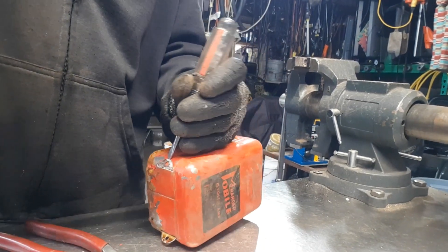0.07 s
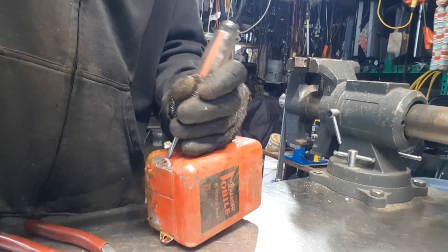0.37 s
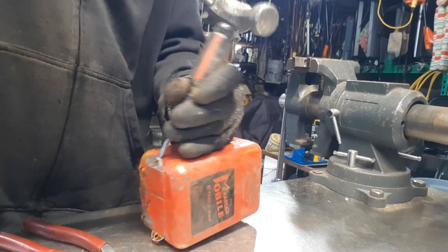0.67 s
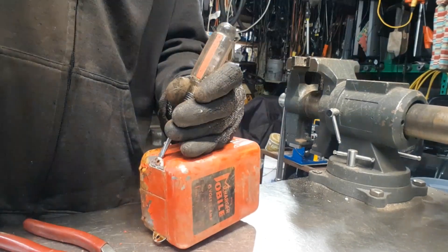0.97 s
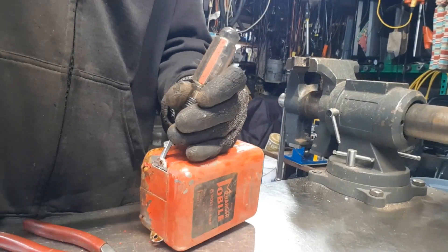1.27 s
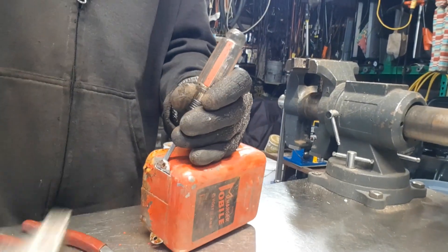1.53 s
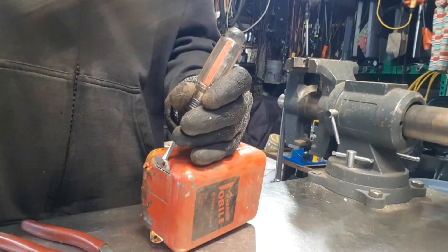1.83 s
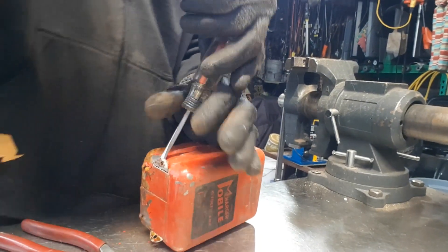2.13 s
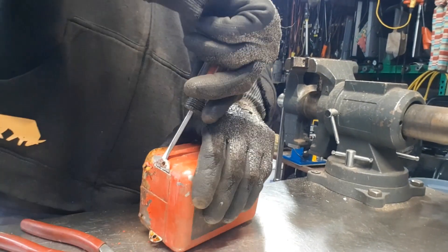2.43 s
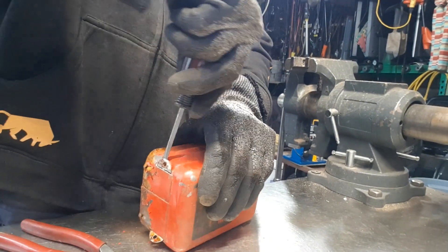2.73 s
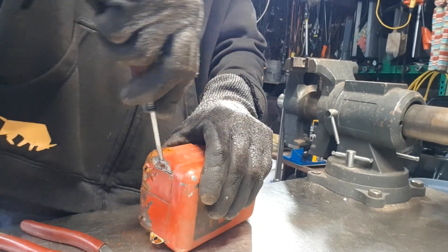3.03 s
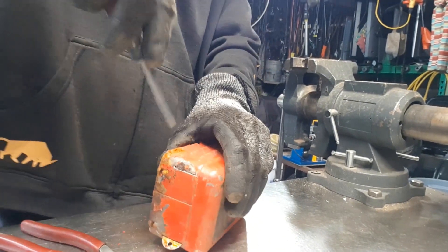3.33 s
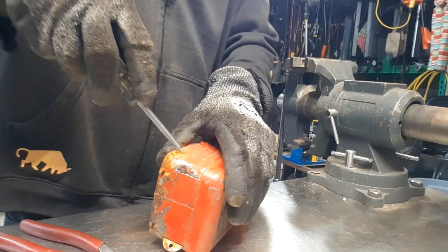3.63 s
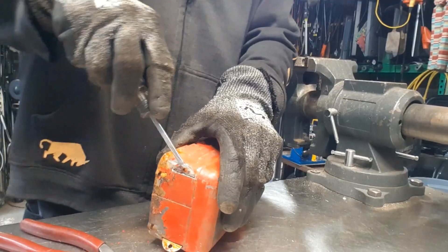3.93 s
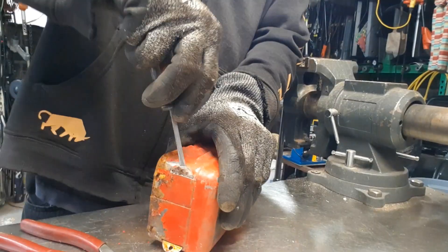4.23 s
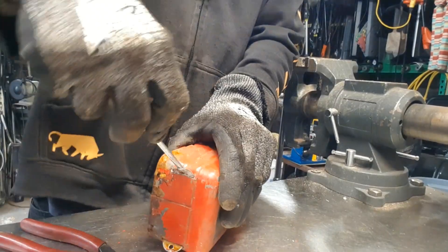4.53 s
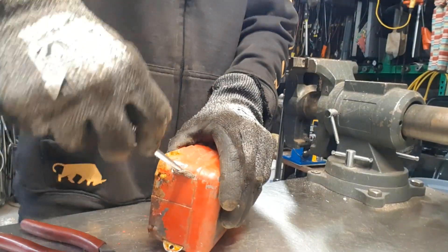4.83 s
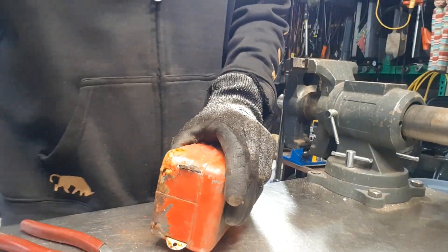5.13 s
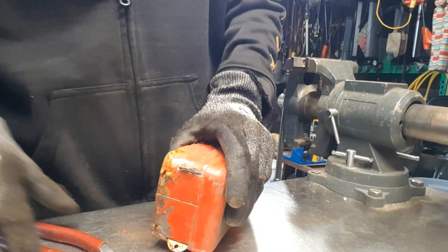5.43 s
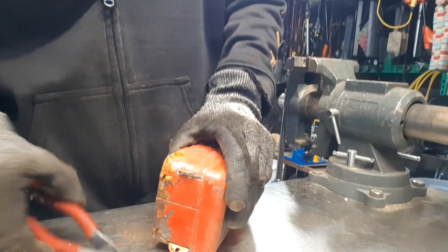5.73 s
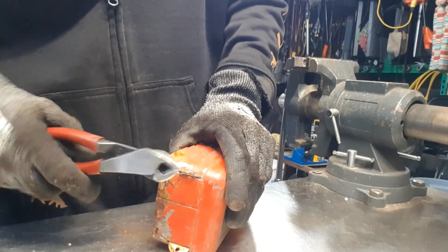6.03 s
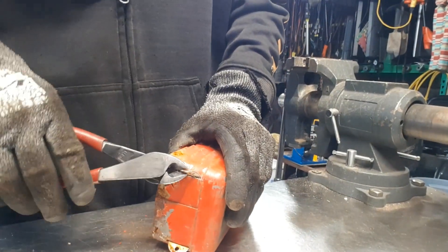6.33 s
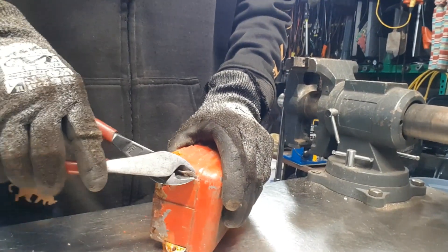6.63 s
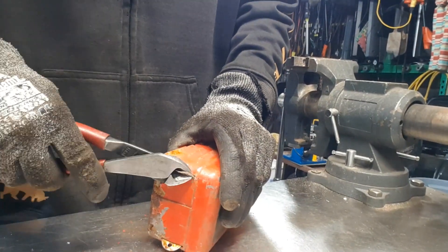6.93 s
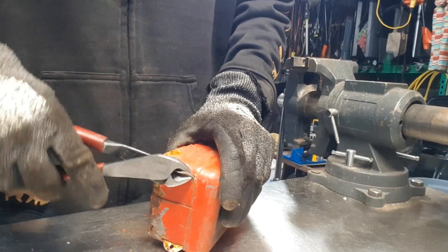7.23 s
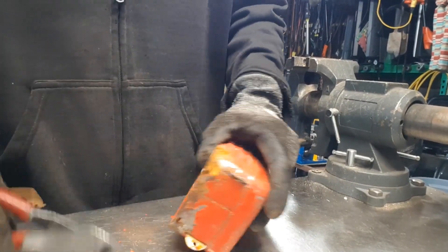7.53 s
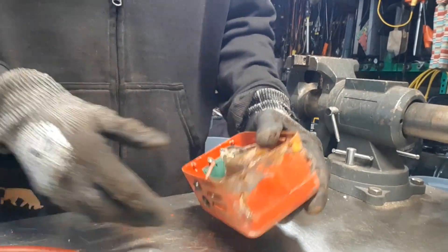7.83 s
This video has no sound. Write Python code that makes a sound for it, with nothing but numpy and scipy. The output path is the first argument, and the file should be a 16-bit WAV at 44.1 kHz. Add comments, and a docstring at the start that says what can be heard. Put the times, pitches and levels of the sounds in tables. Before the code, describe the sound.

Sharp hammer taps on sheet metal give way to faint prying ticks, glove rustle and loud knocks and scrapes on a workbench.

```python
"""Gloves rustle over a low workshop rumble, a blade slips, and a hammer drives a screwdriver into the
seam of a small sheet-metal case. The blade levers at the bent rim, pliers are dragged off the steel
bench, bite the rim and are dropped, and the case tips open. Each impact excites damped modes of metal
and bench, and the small, crowded room answers; stick-slip friction makes the scrapes.
Midway a deep hum swells briefly."""
import sys
import numpy as np
from scipy import signal
from scipy.fft import rfft, irfft
from scipy.io import wavfile

SR = 44100
rng = np.random.default_rng(int(sys.argv[2]) if len(sys.argv) > 2 else 0)


def wav_out(sig):
    """Save sig, one row per channel (or a flat mono array), as 16-bit PCM at SR to the path in sys.argv[1]."""
    wavfile.write(sys.argv[1], SR, np.round(np.clip(np.atleast_2d(sig).T, -1, 1) * 32767).astype(np.int16))


N = 356901
RING_S = np.arange(SR // 2) / SR  # time since a contact
COHERENCE_HZ = 630  # below this, left and right move nearly in step


def undb(db):
    """Convert decibels to an amplitude ratio."""
    return 10 ** (np.asarray(db) / 20)


def unit(x, size=None):
    """Normalise to rms 1, judged over the first size samples if given."""
    return x / np.sqrt(np.mean(x[..., :size] ** 2) + 1e-20)


def band(x, lo_hz, hi_hz):
    """A causal band-pass filter confines a sound to one register."""
    sos = signal.butter(3, [lo_hz, min(hi_hz, SR / 2 - 1)], "band", fs=SR, output="sos")
    return signal.sosfilt(sos, x)


def fade(t, t60):
    """Damping gives exponential decay, 60 dB in t60 seconds."""
    return np.exp(-np.log(1000) * t / t60)


def wander(rate_hz, size):
    """Interpolated noise gives a slow fluctuation with a spread near 1."""
    at = np.arange(size) * rate_hz / SR
    return np.interp(at, np.arange(size // 20), rng.standard_normal(size // 20))


def stroke(start, length):
    """A sine-squared envelope swells and dies away like a movement."""
    return np.sin(np.pi * np.clip((np.arange(N) / SR - start) / length, 0, 1)) ** 2


def noise(spectrum, size):
    """Coloured noise in a diffuse field: left and right share the long waves."""
    hz = np.maximum(np.arange(size // 2 + 1) * SR / size, 1)
    corner_hz, corner_db = np.array(spectrum).T
    mid, side = rfft(rng.standard_normal((2, size)))
    coherence = .95 / (1 + (hz / COHERENCE_HZ) ** 3)
    pair = mid * np.sqrt(1 + coherence) + side * np.sqrt(1 - coherence) * np.array([[1], [-1]])
    return irfft(pair * undb(np.interp(np.log(hz), np.log(corner_hz), corner_db)), size)


def crackle(per_second, spread_db, grain_s):
    """Shot noise: tiny catches in three colours fall at random, a few far larger than the rest."""
    out, t = 0, RING_S[:SR // 20]
    for _ in range(3):
        moments = rng.random(N) < per_second / 3 / SR
        catches = moments * undb(spread_db * np.minimum(rng.exponential(size=N), 3))
        grain = rng.standard_normal((2, len(t))) * (np.exp(-t / grain_s) + .04 * fade(t, .15))
        out = out + signal.oaconvolve(catches[None], grain, axes=1)[:, :N]
    return out


def damped(modes, t60_s):
    """Uniform damping gives all modes of one piece of metal the same decay time."""
    return [(hz, db, t60_s) for hz, db in modes]


def ringer(modes):
    """Modal superposition: return a function that sums damped sines in a new mix for each strike."""
    hz, db, t60 = np.array(modes).T
    waves = np.exp(2j * np.pi * hz[:, None] * RING_S) * fade(RING_S, t60[:, None])

    def ring():
        amplitude = undb(db + 3 * rng.standard_normal(len(hz))) * rng.choice([-1, 1], len(hz))
        # short waves reach left and right out of step
        phase = np.minimum(hz / COHERENCE_HZ, 2) * rng.standard_normal((2, len(hz))) * .7
        grip_detune = 1 + .012 * rng.standard_normal()
        pair = ((amplitude * np.exp(1j * phase)) @ waves).imag
        return np.array([np.interp(RING_S * grip_detune, RING_S, x) for x in pair])
    return ring


def add(out, start, x):
    """Superpose a sound on the mix from its start in seconds."""
    i = int(start * SR)
    out[:, i:i + x.shape[1]] += x[:, :N - i]


# Each row: frequency in Hz, spectral density of rubbing cloth in dB.
CLOTH_SPECTRUM = [(150, -21), (250, -1.5), (1100, -11), (2200, -13), (7440, -27.5), (14700, -22),
                  (16000, -31)]
# Each row: start in seconds, length in seconds, cloth rub in dB, bench sway in dB.
ARM_MOVES = [(0.0, 0.75, -63, -43), (1.902, 2.18, -66, -57), (3.191, 1.74, -62.5, -59),
             (4.393, 1.16, -68.5, -55.5), (5.42, 0.84, -70.5, -59.5), (5.886, 1.66, -64, -56.5),
             (7.284, 0.91, -46, -45)]
def glove_rub(resting_db=-79, catch_db=-6, scratch_db=-13.5):
    """Friction noise: gloves and sleeves rub with uneven pressure, catch, and scratch on chipped paint."""
    pressure_db = 3.5 * wander(14, N) + 2.5 * wander(70, N)
    catches = undb(catch_db) * unit(band(crackle(60, 3.5, .003), 500, 3000))
    scratches = undb(scratch_db) * unit(band(crackle(45, 4.5, .0006), 5500, 15500))
    effort = undb(resting_db) + sum(undb(db) * stroke(start, length) for start, length, db, _ in ARM_MOVES)
    return (unit(noise(CLOTH_SPECTRUM, N)) + catches + scratches) * effort * undb(pressure_db)


# Each row: frequency in Hz, spectral density of the bench's rumble in dB.
RUMBLE_SPECTRUM = [(22, -10), (87, -5.5), (232, -19.5), (400, -28), (560, -59)]
def bench_rumble(resting_sway_db=-64, resting_jostle_db=-62, jostle_db=-5):
    """Forced vibration: the bench sways and rumbles under the leaning arms."""
    lean = sum(undb(db) * stroke(start, length) for start, length, _, db in ARM_MOVES)
    sway = unit(band(noise(RUMBLE_SPECTRUM, N), 32, 89)) * (undb(resting_sway_db) + lean)
    jostle = unit(band(noise(RUMBLE_SPECTRUM, N), 49, 780))
    jostle *= undb(resting_jostle_db) + undb(jostle_db) * lean
    return sway + jostle * undb(3 * wander(23, N))


# Each row: frequency in Hz, spectral density of the room's background in dB.
AIR_SPECTRUM = [(15, -23), (25, -6), (87, -1), (263, -11.5), (677, -22.5), (1400, -23), (16000, -45.5)]
def shop_air(level_db=-62):
    """Stationary noise, strongest in the bass, is the quiet air of the shop."""
    return unit(noise(AIR_SPECTRUM, N)) * undb(level_db)


# Each row: frequency of a bench mode in Hz, level in dB, 60 dB decay time in seconds.
BENCH_MODES = [(68, -2, .3), (92, 2, 0.25), (109, 2.5, 0.45), (178, -7, .4), (194, -13.5, 0.84),
               (398, -6, 0.16), (455, 0, 0.17), (568, 2, 0.12), (655, -4, 0.16), (812, 0, 0.08)]
# Each row: frequency of a mode of the case's rim in Hz, level in dB.
RIM_MODES = [(880, -4), (1125, -3), (1430, -6), (1770, -2), (2110, -5), (2330, -3), (2490, -3), (3360, -7),
             (4180, -14), (5800, -17)]
# Thud, body, clang and crack. Each row: lower limit in Hz, upper limit in Hz.
REGISTERS = [(45, 250), (250, 900), (900, 4000), (4000, 17000)]
# Each row: one register's reverberation time in seconds, contact time constant in seconds.
REGISTER_DECAYS = [(0.29, 0.067), (0.28, 0.022), (0.2, 0.017), (0.17, 0.011)]
RIM_T60_S, SNAP_S = .04, .0056
SPOT_BEND_HZ, SPOT_SETTLE_S, SPOT_CHOKE_DB_PER_DB = 60, .007, .5
PING_SPOT_DB, PING_SPOT_T60_S = 5.5, .03
def impacts(rows, metal, spectrum, *, thud_db, clang_db, crack_db, ping_db, edge_share, bite, ring_db,
            tail_db, tail_hold_s, force_db, spot_db, spot_ring_db, spot_t60_s, snap_db, damping_db_per_s):
    """Impulse response: a contact rings bench, metal and rim in a wash of noise and reflections.
    Strength sets the body, and the other registers follow it. Weight raises the thud and shifts the
    crack by bite dB per dB; edge raises the ping and, by edge_share, the clang and crack."""
    out = np.zeros((2, N))
    ring, ring_rim = ringer(BENCH_MODES + metal), ringer(damped(RIM_MODES, RIM_T60_S))
    hardest = max(row[1] for row in rows)
    snap = 1 + undb(snap_db) * np.exp(-RING_S / SNAP_S)  # the first bite of steel on steel
    grip_loss = undb(-damping_db_per_s * RING_S)
    rise = 1 - np.exp(-RING_S / .0007)  # the blow takes a moment to spread through the metal
    for start, strength, weight, spot_hz, edge in rows:
        modes, wash = ring(), noise(spectrum, len(RING_S))
        # the struck spot has its own resonance, which starts sharp and settles as the contact relaxes
        wash = wash + undb(spot_db) * band(wash, .86 * spot_hz, 1.16 * spot_hz)
        bend = SPOT_BEND_HZ * rng.random() * SPOT_SETTLE_S * (1 - np.exp(-RING_S / SPOT_SETTLE_S))
        spot = np.sin(2 * np.pi * (spot_hz * RING_S + bend) + rng.random((2, 1)) * np.pi / 4)
        choke_db = SPOT_CHOKE_DB_PER_DB * max(weight, 0)
        modes = modes + undb(spot_ring_db - choke_db) * spot * fade(RING_S, spot_t60_s)
        # the louder the contact, the longer the noisy tail holds before decaying; force_db sets how much
        # stronger or weaker it grows
        relative_db = strength - hardest
        force = undb(relative_db)
        tail = undb(tail_db + force_db * force + 2.5 * wander(260, len(RING_S)))
        decay_time = np.maximum(RING_S - tail_hold_s * force, 0)
        # a harder contact is a brighter one
        clang = clang_db + edge_share * edge + .073 * relative_db
        crack = crack_db + edge_share * edge + bite * weight + .39 * relative_db
        levels = strength + np.array([thud_db + weight, 0, clang, crack])
        registers = zip(REGISTERS, REGISTER_DECAYS, levels, ring_db, (1, 1, 1, snap))
        for (lo, hi), (t60, contact_s), db, mode_db, onset in registers:
            attack = SR // 70 + SR // lo  # samples over which the level is set
            envelope = np.hypot(np.exp(-RING_S / contact_s), tail * fade(decay_time, t60))
            burst = unit(band(wash * envelope, lo, hi), attack)
            ringing = undb(mode_db) * unit(band(modes, lo, hi), attack)
            add(out, start, unit((burst + ringing) * onset * grip_loss * rise, attack) * undb(db))
        # the blade's pressure damps the rim differently each time; little edge gives a dull ping
        ping = ring_rim() * rise * fade(RING_S, rng.uniform(.06, .3))
        ping = ping - (1 - min(undb(edge), 1)) * band(ping, 2800, 9000)
        ping = unit(ping, attack) + undb(PING_SPOT_DB) * unit(spot * fade(RING_S, PING_SPOT_T60_S), attack)
        add(out, start, unit(ping, attack) * undb(strength + ping_db + edge))
    return out


# Each row: frequency in Hz, spectral density of a slip in dB.
SLIP_SPECTRUM = [(35, -32.5), (60, 0.5), (190, -5), (458, -2.5), (700, -8.5), (1380, -16.5), (1780, -16),
                 (2770, -32), (6140, -41), (16000, -46)]
# Each row: start in seconds, strength in dB, weight in dB, spot frequency in Hz, edge in dB.
SLIPS = [(0.0878, -42.5, 6, 1730, -10), (2.4116, -46.5, 4.5, 725, -9), (2.5805, -65, 15, 1540, 8.5),
         (3.2022, -38.5, 4, 964, 4), (3.2317, -42.5, 17, 890, 3), (3.4493, -46.5, 13.5, 420, -14),
         (3.7166, -51.5, -5, 595, -17), (3.8228, -42.5, -9, 2470, 1.5), (4.06, -52.5, 11.5, 1070, -3),
         (4.9025, -32.5, 3.5, 975, 1.5), (4.914, -38.5, 6, 1100, -2), (6.2184, -45, 9, 3500, -7),
         (6.3383, -34, -1, 2330, -3.5), (6.542, -44, 4.5, 1130, -12), (6.774, -40.5, 6.5, 820, -14),
         (7.0685, -39, -3, 965, 6), (7.25, -49.5, 7, 950, 1.5), (7.2983, -33, 1.5, 440, -17.5),
         (7.3228, -41.5, 11.5, 1660, -8), (7.338, -49.5, -2, 1730, -3), (7.377, -51, 2, 990, 6.5),
         (7.427, -30.5, -1, 430, -19)]
def tool_slips():
    """Sudden release of strain: blade and jaws slip on the rim and excite its short-lived modes."""
    return impacts(SLIPS, damped(RIM_MODES, RIM_T60_S), SLIP_SPECTRUM,
                   thud_db=-7.5, clang_db=-2.5, crack_db=-14, ping_db=.5, edge_share=.49, bite=-.077,
                   ring_db=[7, -8, -20.5, -33], tail_db=-3, tail_hold_s=.0047, force_db=-5.5,
                   spot_db=-3, spot_ring_db=3, spot_t60_s=.0026, snap_db=-30, damping_db_per_s=34)


# Each row: frequency of a mode of the case in Hz, level in dB.
CASE_MODES = [(920, -7), (1190, -2), (1690, -5), (1905, -4), (2056, -6), (2370, -1), (2735, -6), (2890, -6),
              (3100, -8), (3410, -11), (4100, -13), (5700, -10), (11100, -12)]
# Each row: frequency in Hz, spectral density of struck sheet metal in dB.
SHEET_SPECTRUM = [(24, -33.5), (40, -11.5), (101, 1.5), (137, -2), (194, -11), (290, -11.5), (392, -3),
                  (542, -8), (810, -14.5), (1410, -21.5), (2840, -24.5), (7000, -39), (11300, -33),
                  (16000, -38.5)]
# Each row: start in seconds, strength in dB, weight in dB, spot frequency in Hz, edge in dB.
BLOWS = [(0.2636, -16, 1.5, 1153, 4), (0.6433, -14.5, 2.5, 556.3, 0.5), (1.0787, -15.5, -5, 1152, -3.5),
         (1.6050, -17, -6, 728, -5), (1.6497, -17.5, -15.5, 800, -1), (1.7529, -15, -6, 530, -4)]
def hammer_blows():
    """Momentum transfer: blows and rebounds pass down the screwdriver into the case's bending modes."""
    return impacts(BLOWS, damped(CASE_MODES, t60_s=.26), SHEET_SPECTRUM,
                   thud_db=-3, clang_db=-2.5, crack_db=-7, ping_db=-2.5, edge_share=.075, bite=-.15,
                   ring_db=[-1.5, -1.5, -5.5, -12.5], tail_db=-6, tail_hold_s=.044, force_db=-2,
                   spot_db=-12.5, spot_ring_db=1, spot_t60_s=.022, snap_db=3, damping_db_per_s=14.5)


def light_contacts(rows, modes, ring_db, snap_s, tail_db):
    """A brief contact has a broad spectrum: a bright snap, a thin ring and a little reverberation."""
    out, ring = np.zeros((2, N)), ringer(modes)
    for start, db in rows:
        envelope = np.exp(-RING_S / snap_s) + undb(tail_db) * fade(RING_S, .24)
        snap = band(rng.standard_normal((2, len(RING_S))) * envelope, 1400, 27000)
        sound = unit(snap, size=400) + undb(ring_db) * unit(band(ring(), 4200, 18000), size=400)
        add(out, start, unit(sound, size=400) * undb(db))
    return out


# Each row: start in seconds, attack level in dB.
TICKS = [(0.5674, -48), (1.9132, -51), (1.938, -53.5), (2.4617, -55.5), (2.8918, -57), (2.9383, -51),
         (3.216, -52), (3.23, -40), (3.8235, -51), (4.2716, -50.5), (4.655, -64.5), (4.712, -57),
         (4.7745, -63), (5.003, -63), (5.5484, -35), (6.219, -44), (6.4405, -54), (6.4985, -51),
         (6.7292, -51.5), (6.8145, -52), (7.324, -42.5), (7.446, -38), (7.5088, -47), (7.5467, -46),
         (7.782, -29)]
def rim_ticks():
    """Small impulses from paint and steel excite the upper modes of the rim."""
    return light_contacts(TICKS, damped(RIM_MODES, RIM_T60_S), ring_db=-7, snap_s=.003, tail_db=-19.5)


# Each row: frequency of a screwdriver mode in Hz, level in dB, 60 dB decay time in seconds.
SHANK_MODES = [(7714, -11, .07), (13173, 0, .09), (13722, -7, .08)]
# Each row: start in seconds, attack level in dB.
TINKS = [(0.9827, -54), (1.256, -48)]
def shank_tinks():
    """Free vibration of a rod: the screwdriver rings high when the hammer face touches it."""
    return light_contacts(TINKS, SHANK_MODES, ring_db=10, snap_s=.0032, tail_db=-30.5)


# Each row: frequency in Hz, spectral density in dB, for the hiss here and the bench knocks below.
STEEL_SPECTRUM = [(40, -40), (91, -5), (140, -13.5), (185, -8.5), (270, -18), (444, -7.5), (1020, -17.5),
                  (1900, -20), (7000, -36), (11600, -31.5), (16000, -37.5)]
# Each row: start in seconds, length in seconds, level in dB.
SWISHES = [(1.986, 0.17, -62.5), (2.156, 0.26, -53.5)]
def glove_swish():
    """Sliding friction: a glove makes broadband noise along the screwdriver."""
    cloth = unit(band(noise(CLOTH_SPECTRUM, N), 670, 17000))
    hiss = .73 * unit(band(noise(STEEL_SPECTRUM, N), 3000, 10300))
    return (cloth + hiss) * sum(undb(db) * stroke(start, length) for start, length, db in SWISHES)


# Each row: frequency of a mode of the pliers in Hz, level in dB.
PLIERS_MODES = [(420, 5), (505, 5), (650, 2), (1170, -3), (1530, -4), (1660, -3), (1870, -3), (2330, -5),
                (3040, -11), (5600, -13)]
# Each row: start in seconds, strength in dB, weight in dB, spot frequency in Hz, edge in dB.
KNOCKS = [(3.2375, -30.5, 1, 408, -10), (3.262, -38.5, -14, 315, -10), (5.2146, -19.5, -0.5, 457, 0),
          (5.3187, -9, 2.5, 453, -0.5), (5.336, -25.5, -24, 527, 15), (5.461, -33, 17.5, 650, 6),
          (5.4865, -23, -17, 600, -11), (5.4955, -14.5, -8, 465, 3), (5.5709, -18.5, 3, 462, 0),
          (5.584, -20, 1, 371, 0), (5.666, -22, 2, 453, 1), (5.7093, -27, 4, 486, -1.5),
          (5.7934, -27.5, 6, 445, -3), (5.9332, -39, 0, 511, -3.5), (6.125, -42, 5, 492, -5),
          (7.6245, -11.5, 9, 484, 7), (7.699, -17.5, 12, 587, 7), (7.7119, -14.5, 12, 430, 5),
          (7.7214, -13.5, 10, 454, 1), (7.7445, -10.5, -14, 401, 2.5), (7.8061, -20, 13, 477, 9.5),
          (7.8292, -15.5, 15, 527, 3), (7.8881, -15, 9, 456, 2.5), (7.9, -20.5, 13, 374, -5.5),
          (8.0478, -28, 15.5, 377, -3.5)]
def bench_knocks():
    """Impact excitation: pliers and case knock on the bench, which resonates at the struck spot."""
    return impacts(KNOCKS, damped(PLIERS_MODES, t60_s=.12), STEEL_SPECTRUM,
                   thud_db=-20.5, clang_db=-9, crack_db=-13.5, ping_db=-26, edge_share=1, bite=.036,
                   ring_db=[-13.5, 9, -3.5, -17.5], tail_db=2.5, tail_hold_s=.0022, force_db=11,
                   spot_db=1.5, spot_ring_db=16, spot_t60_s=.062, snap_db=-3, damping_db_per_s=27)


# Each row: start in seconds, length in seconds, grind level in dB, grit relative to grind in dB.
DRAGS = [(3.637, 0.12, -75, 2.5), (4.42, 0.087, -62.5, -2.5), (5.21, 0.14, -46.5, -3),
         (5.736, 0.071, -44.5, -10.5), (6.204, 0.11, -62, -16), (6.4, 0.19, -53, -9.5),
         (6.647, 0.2, -60.5, 0), (6.854, 0.1, -60, -0.5), (7.296, 0.076, -55, 3), (7.416, 0.7, -67, 12),
         (7.68, 0.23, -32, -18)]
def scrapes():
    """Stick-slip friction: steel drags over bench and paint, a coarse grind under finer grit."""
    grind = unit(band(crackle(700, 3, .002), 600, 2800))
    grit = unit(band(crackle(350, 4.5, .0005), 3800, 15500))
    return sum((grind + undb(grit_db) * grit) * undb(db) * stroke(start, length)
               for start, length, db, grit_db in DRAGS)


def hum(hz=47.35, start_s=4.55, length_s=.82, level_db=-46.5):
    """Simple harmonic motion: a deep pure tone comes up for a moment and stops."""
    envelope = np.sqrt(2 * np.sqrt(stroke(start_s, length_s)))
    return undb(level_db) * envelope * np.sin(2 * np.pi * hz * np.arange(N) / SR)


def pan(x, left_db, right_lag_s=0):
    """Localisation cues: a sound seems to lie on the side where it is louder or arrives sooner."""
    t = np.arange(N) / SR
    pair = np.array([x[0], np.interp(t - right_lag_s, t, x[1])])
    return pair * undb(np.array([[left_db], [-left_db]]) / 2)


def scene():
    """Linear superposition: all the sources add, each a little to the left."""
    blows = pan(hammer_blows(), left_db=3.5)
    knocks = pan(bench_knocks(), left_db=3, right_lag_s=.00018)
    prying = tool_slips() + rim_ticks() + shank_tinks() + scrapes() + glove_rub() + glove_swish()
    background = bench_rumble() + shop_air() + hum()
    return blows + knocks + pan(prying, left_db=3.5) + pan(background, left_db=2.5)


def record(dry):
    """Soft saturation rounds the loudest peaks, and a steep low-pass cuts the top."""
    ceiling, top_hz = 1.05, 16000
    low_pass = signal.ellip(10, .2, 70, top_hz, fs=SR, output="sos")
    return signal.sosfilt(low_pass, ceiling * np.tanh(dry / ceiling))


dry = scene()
out = record(dry)
wav_out(out)
```